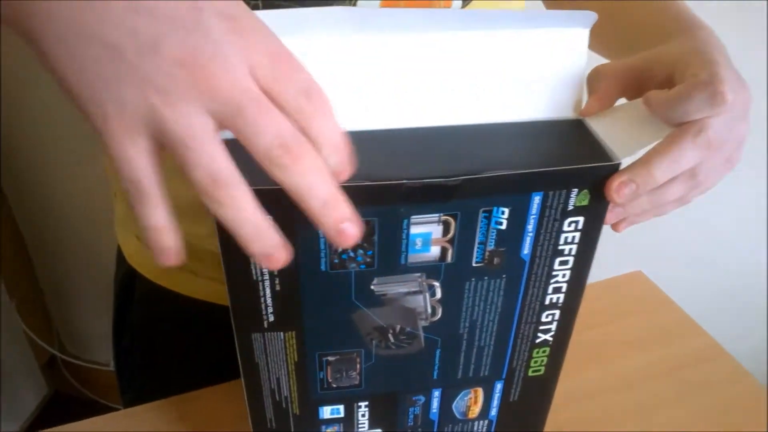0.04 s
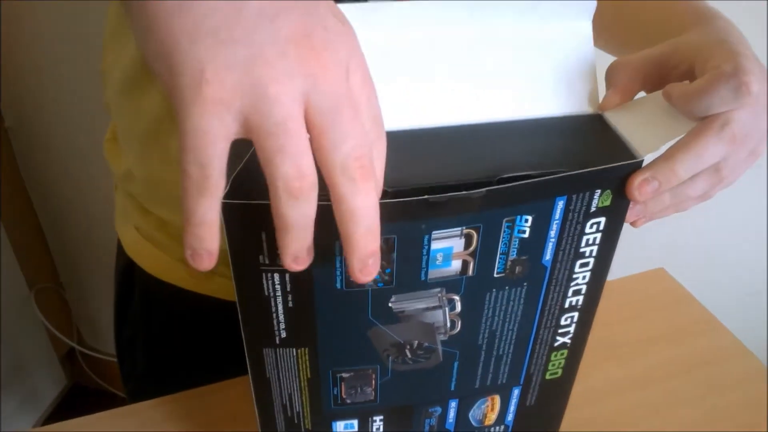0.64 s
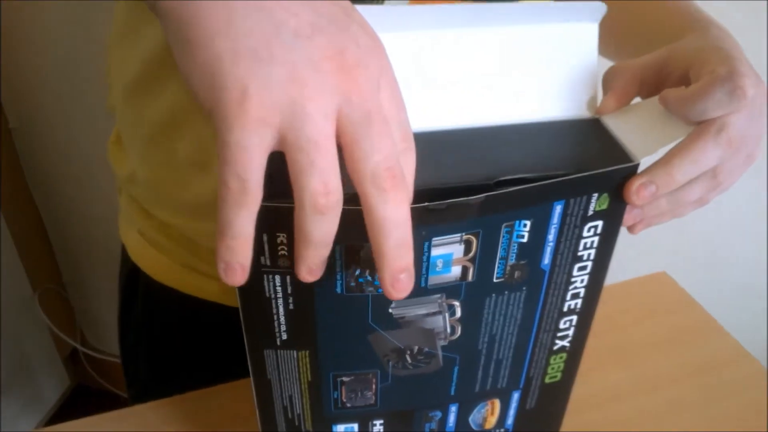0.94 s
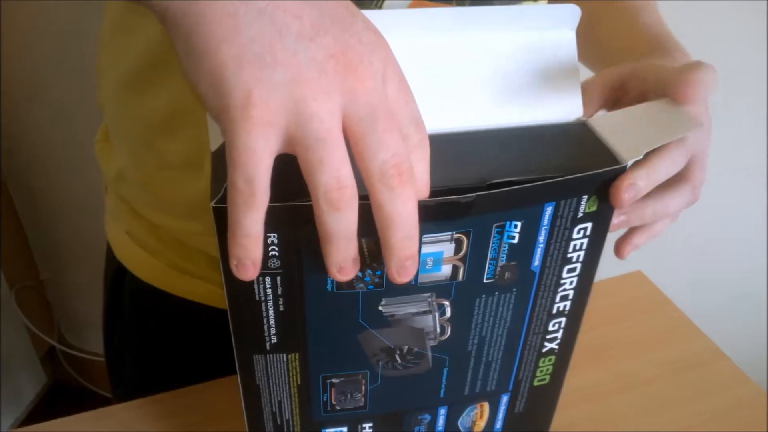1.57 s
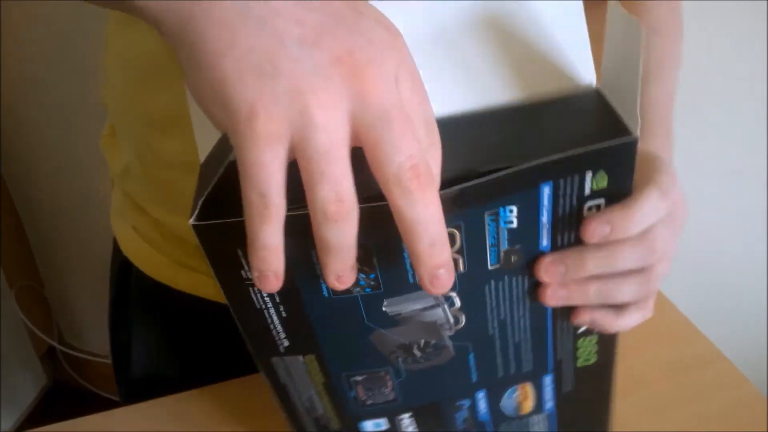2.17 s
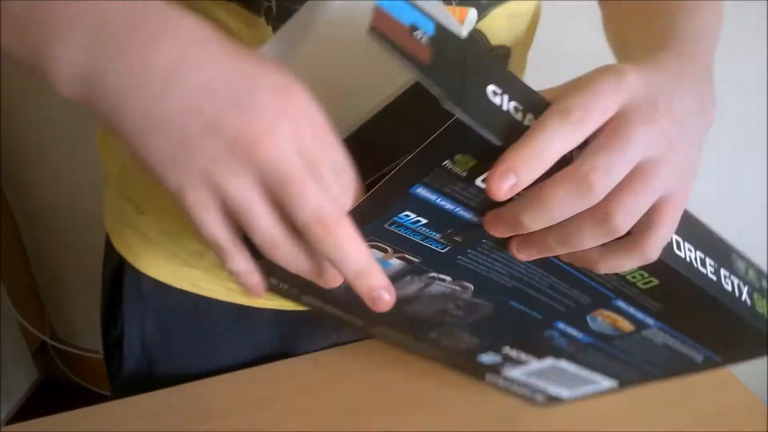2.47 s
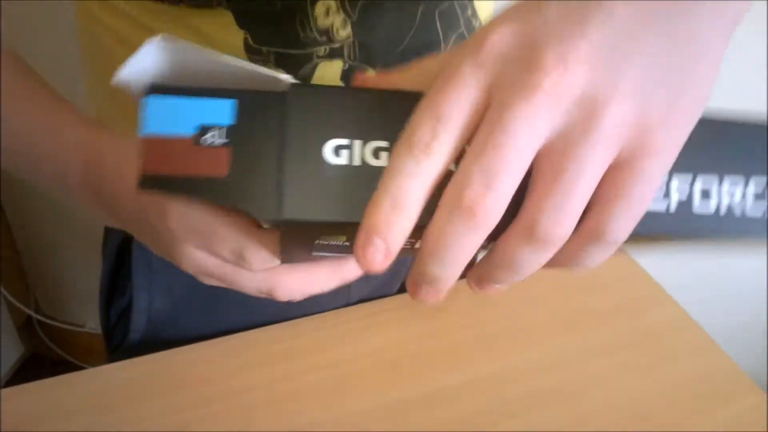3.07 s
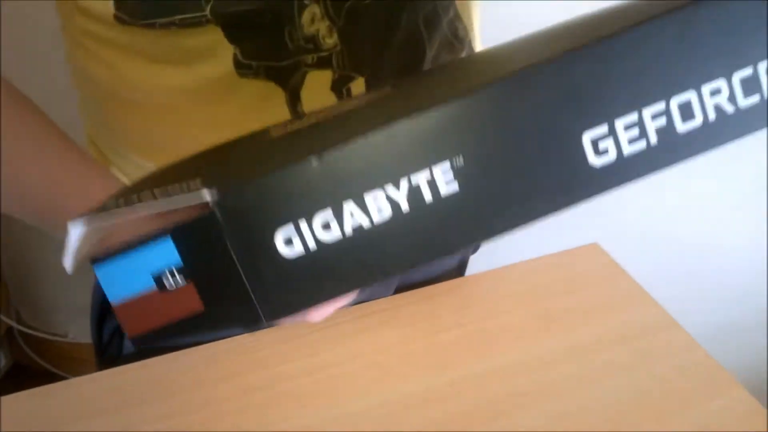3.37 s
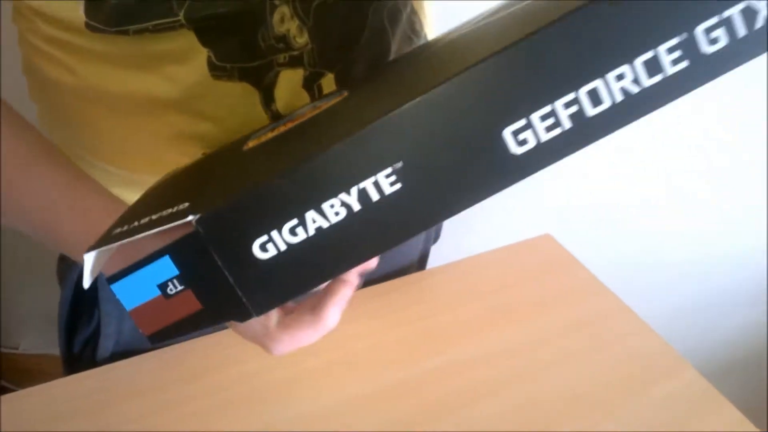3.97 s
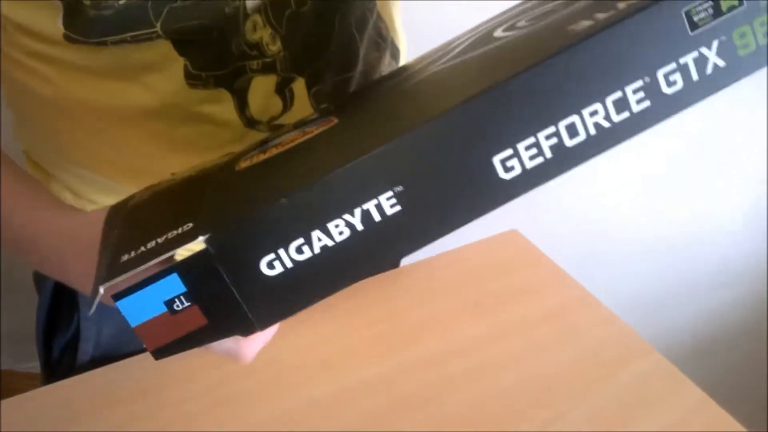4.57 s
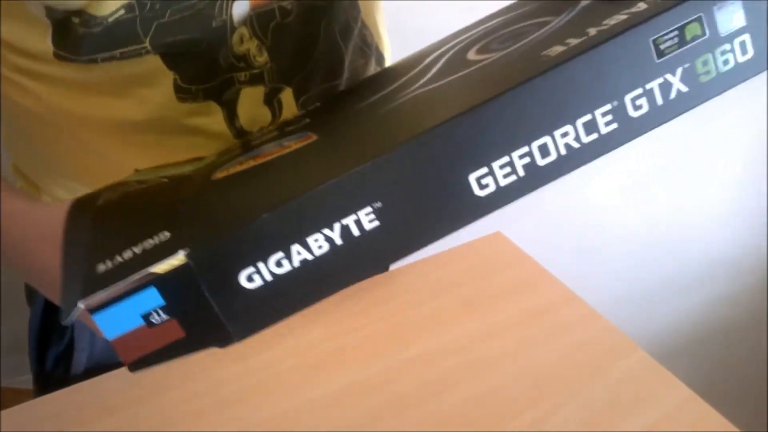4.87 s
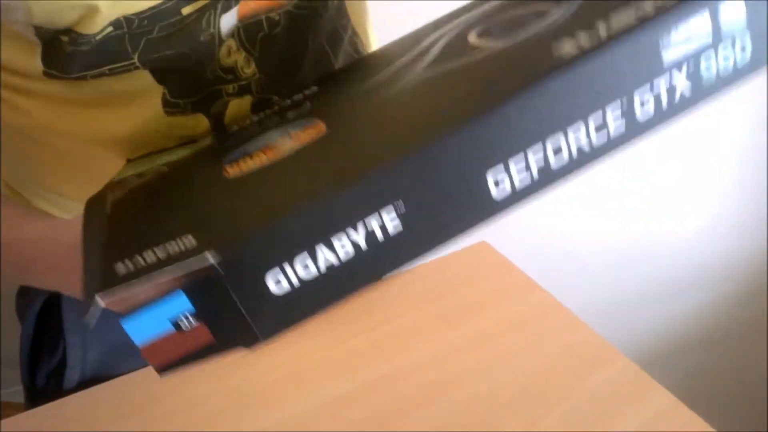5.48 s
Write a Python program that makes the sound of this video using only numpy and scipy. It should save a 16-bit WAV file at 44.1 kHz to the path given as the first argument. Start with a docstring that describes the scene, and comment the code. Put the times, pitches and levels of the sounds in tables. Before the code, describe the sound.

Fingertips drag and bump over a cardboard box, and the strained board gives scattered hollow ticks. A flap snaps free with a sharp crunch. The box is tipped with a short, squeaky scrape, then the inner box slides softly in its sleeve, with tiny cracks and one brief groan. The microphone is close, over a desk in a small, quiet room.

```python
"""Fingers brush and bump a cardboard box, close to a mono microphone over a desk in a small room.
The strained board lets go in single ticks that ring the hollow box, and a flap snaps free.
The box is tipped with a squeaky stick-slip scrape; then the inner box slides in its sleeve and
groans once. The desk and nearby walls add a short tail, with quiet room tone underneath."""
import sys
import numpy as np
from scipy import signal
from scipy.fft import rfft, irfft
from scipy.io import wavfile

SR = 44100
rng = np.random.default_rng(int(sys.argv[2]) if len(sys.argv) > 2 else 0)


def bounce(signal):
    """Save signal as a 16-bit WAV file at the path given by the first command-line argument."""
    frames = np.transpose(np.atleast_2d(signal))
    limited = np.clip(frames, -1, 1)
    pcm = np.round(limited * 32767).astype(np.int16)
    wavfile.write(sys.argv[1], SR, pcm)


N = 243431
TIME = np.arange(N) / SR
TAIL = TIME[:SR // 2]  # time axis of one short sound


def undb(db):
    """Decibels to gain."""
    return 10 ** (np.asarray(db) / 20)


def unit(x):
    """Scale to rms 1."""
    return x / np.sqrt(np.mean(x ** 2))


def unit_peak(x):
    """Scale to peak 1."""
    return x / np.abs(x).max()


def fade(t60_s):
    """Exponential decay from 1, down 60 dB after t60_s."""
    return np.exp(-np.log(1000) * TAIL / t60_s)


def burst(t60_s):
    """White noise that dies away."""
    return rng.standard_normal(len(TAIL)) * fade(t60_s)


def wander(rate_hz):
    """Random motion with a spread near 1."""
    return np.interp(TIME * rate_hz, np.arange(N), rng.standard_normal(N))


def add(track, start_s, sound):
    """Mix a sound in at a time."""
    i = int(start_s * SR)
    track[i:i + len(sound)] += sound[:N - i]


def through(x, response):
    """Pass a sound through an impulse response."""
    return signal.fftconvolve(x, response)[:len(x)]


def colour(x, points, size=4096):
    """Minimum-phase filter through (freq_hz, gain_db) points."""
    hz, db = np.transpose(points)
    bins_hz = np.arange(size // 2 + 1) * SR / size
    gain = undb(np.interp(np.log(bins_hz + 1), np.log(hz), db))
    cepstrum = irfft(np.log(gain))[:size // 2]
    cepstrum[0] /= 2
    return through(x, irfft(np.exp(rfft(2 * cepstrum, size))))


def ring(modes, detune=0):
    """Decaying modes with unit energy; detune is the grip shifting each a little."""
    out = np.zeros(len(TAIL))
    for hz, db, t60_s in modes:
        pitch_hz = hz * (1 + detune * rng.standard_normal())
        out += undb(db) * fade(t60_s) * np.sin(2 * np.pi * (pitch_hz * TAIL + rng.random()))
    return out / np.linalg.norm(out)


def grains(per_s, spread_db):
    """Fibres catching at random moments with varying force."""
    force = undb(spread_db * np.minimum(rng.standard_exponential(N), 2 * np.pi))
    return unit(rng.standard_normal(N) * force * (rng.random(N) < per_s / SR))


def stroke(start_s, length_s, attack_s, release_s):
    """Gain of one movement: it gathers speed, more slowly if it is long, holds, then dies away."""
    rise_s = attack_s + 0.14 * length_s
    rise = np.sin(np.pi / 2 * np.clip((TIME - start_s) / rise_s, 0, 1)) ** 2
    return rise * np.exp(-np.clip((TIME - start_s - length_s) / release_s, 0, 20))


# Room tone at the microphone: freq_hz, gain_db
ROOM_TONE_COLOUR = [(15, -14), (25, -12), (53, 0.5), (101, -5.5), (221, 0), (340, -7.5), (482, -10.5),
                    (1140, -15.5), (1750, -16.5), (2490, -17.5), (3630, -25), (5580, -24.5), (15500, -28)]
def room_tone(level_db=-58.5):
    """The small room's steady, low background noise."""
    return undb(level_db) * unit(colour(rng.standard_normal(N), ROOM_TONE_COLOUR))


def room(x, t60_s=0.25, wet_db=-11):
    """The close sound, then 5 ms later a short tail from the desk and nearby walls."""
    reflections = burst(t60_s) * (TAIL > 0.005)
    tail = colour(reflections, [(60, 0), (250, 3), (2000, -0.5), (6000, 2), (16000, -1.5)])
    return x + undb(wet_db) * through(x, tail / np.linalg.norm(tail))


# Modes of the hollow box: pitch_hz, level_db, t60_s
BOX_MODES = [(140, -4.5, 0.27), (225.7, -0.5, 0.22), (288, 1.5, 0.2), (345.1, 2, 0.29), (457, 2.5, 0.17),
             (547.7, -4, 0.25), (620, -8, 0.14), (828, -0.5, 0.16), (953, -5, 0.13), (1050, -12, 0.04),
             (1090, -17, 0.078), (1274, 1, 0.037), (1317, -1, 0.14), (1490, -15, 0.076), (1625, -12, 0.14),
             (1790, -7, 0.061), (1837, -24.5, 0.98), (1880, -9, 0.16), (2346, -3.5, 0.12), (2450, -9, 0.17),
             (2840, -11, 0.25), (3500, -21, 0.25)]
def with_box_ring(x, ring_db):
    """A contact sound plus the ringing it drives in the box, ring_db relative to it."""
    return x + undb(ring_db) * np.std(x) * unit(through(x, ring(BOX_MODES)))


# Shaken panels and brushing paper fibres: freq_hz, gain_db
RUMBLE_COLOUR = [(25, -28.5), (50, 2.5), (90, -8.5), (180, -1), (320, 4.5), (450, -7.5), (800, -8.5),
                 (1500, -41)]
HISS_COLOUR = [(1500, -36), (3000, -4), (3900, -1.5), (5200, 4), (6800, 1), (8200, -2.5), (10500, -1.5),
               (13000, -6), (16000, -10)]
def friction(strokes, rasp_colour, attack_s, release_s, grains_per_s, spread_db, ring_db):
    """Each stroke rasps on the board's grain, hisses over fine fibres and shakes the panels."""
    rumble = unit(colour(grains(per_s=900, spread_db=0.5), RUMBLE_COLOUR))
    rasp = colour(grains(grains_per_s, spread_db), rasp_colour)
    rasp = unit(with_box_ring(rasp, ring_db))
    hiss = colour(grains(per_s=14000, spread_db=0), HISS_COLOUR)
    hiss = unit(hiss * undb(0.5 * wander(120)))  # the fibres catch unevenly
    out = np.zeros(N)
    for start_s, length_s, rasp_db, hiss_db, rumble_db in strokes:
        blend = undb(rasp_db) * rasp + undb(hiss_db) * hiss + undb(rumble_db) * rumble
        out += stroke(start_s, length_s, attack_s, release_s) * blend
    return out


# Pushes of the inner box: start_s, length_s, rasp_db, hiss_db, rumble_db
SLIDES = [(3.32, 0.056, -54, -76, -49), (3.36, 0.4, -59, -66, -63.5), (3.478, 0.053, -60.5, -65.5, -51),
          (3.708, 0.027, -85, -61, -65), (3.78, 0.067, -69, -84, -81), (4, 0.079, -64.5, -75, -73),
          (4.2, 0.13, -64, -65.5, -65), (4.4, .04, -64.5, -71, -62), (4.438, 0.068, -52, -56.5, -48.5),
          (4.612, 0.026, -48.5, -57.5, -46.5), (4.655, 0.046, -52.5, -55.5, -45.5),
          (4.715, 0.063, -54.5, -69, -44.5), (4.835, 0.015, -54.5, -51.5, -53),
          (4.87, 0.055, -75, -66, -66), (4.918, .125, -53, -52.5, -68), (4.948, 0.072, -58.5, -52.5, -66),
          (5.03, 0.24, -56.5, -60, -61.5), (5.095, 0.094, -65.5, -57, -69), (5.28, 0.18, -66, -64.5, -63)]
# Board on board: freq_hz, gain_db
SLIDE_COLOUR = [(300, -26), (750, -9), (1200, -3), (1550, 1), (2050, 4), (2450, -1.5), (3000, -6.5),
                (3800, -12), (8000, -28)]
def sleeve_slides():
    """The inner box slides in its sleeve with a fine, dense rasp."""
    return friction(SLIDES, SLIDE_COLOUR, attack_s=0.014, release_s=0.016,
                    grains_per_s=9900, spread_db=1.6, ring_db=-13.5)


# Rubbing fingers and the tipping box, close up: start_s, length_s, rasp_db, hiss_db, rumble_db
RASPS = [(-.02, 0.083, -64, -62.5, -67), (.06, 0.058, -53, -55.5, -51), (.12, 0.11, -61, -60.5, -46),
         (.22, 0.048, -48, -52.5, -58), (.272, 0.083, -50, -56.5, -53), (.358, 0.054, -46.5, -53, -52.5),
         (.41, 0.032, -51.5, -58, -51.5), (.518, 0.14, -65, -70.5, -56), (.715, 0.054, -51, -53.5, -58),
         (.79, 0.12, -82, -87, -60.5), (.91, 0.053, -55.5, -58, -60), (.975, 0.072, -65, -66.5, -61),
         (1.1, 0.073, -68, -62.5, -61), (1.23, 0.21, -74, -63, -61), (1.503, .03, -37.5, -46.5, -46),
         (1.575, 0.057, -52.5, -63, -49), (1.83, 0.068, -60, -64, -52.5), (1.955, .08, -57.5, -63.5, -58),
         (2.05, 0.092, -59, -64, -58), (2.1, .095, -49, -50.5, -49), (2.2, 0.094, -48, -60, -48.5),
         (2.31, 0.071, -35, -50.5, -43), (2.38, 0.062, -45.5, -51, -60), (2.45, 0.08, -55.5, -64.5, -50),
         (2.515, 0.062, -54.5, -58.5, -62), (2.6, 0.084, -50.5, -55.5, -67),
         (2.642, .058, -40.5, -48, -40.5), (2.74, .1, -69, -74, -66), (2.875, 0.055, -53.5, -55, -51),
         (3.112, 0.038, -55, -55.5, -57)]
# Rasp of the outer board: freq_hz, gain_db
RASP_COLOUR = [(200, -17), (500, -1), (900, 1.5), (1300, 8), (1900, 1.5), (2700, -1), (3800, -11),
               (8000, -54.5)]
def surface_rasps():
    """Rasp and hiss of rubbing fingers and of the box scraping as it tips."""
    return friction(RASPS, RASP_COLOUR, attack_s=0.016, release_s=0.014,
                    grains_per_s=3000, spread_db=-0.8, ring_db=-10.5)


def scrape(curve, board_colour, slip_hz, speed_up, jitter, grit, force_spread_db, ring_db, trim_db):
    """Uneven stick-slip pulses shake the board and box; their rate grows by the factor speed_up."""
    times_s, levels_db = np.transpose(curve)
    rate_hz = slip_hz * speed_up ** np.interp(TIME, (times_s[0], times_s[-1]), (0, 1))
    cycles = np.cumsum(rate_hz * np.exp(jitter * wander(300))) / SR
    pulses = np.diff(np.floor(cycles), prepend=0)  # one slip per cycle
    slips = pulses * undb(force_spread_db * wander(400)) / np.sqrt(rate_hz)
    drive = unit(slips - slips.mean()) + grit * rng.standard_normal(N)
    moving = (TIME >= times_s[0]) & (TIME <= times_s[-1])
    swell = undb(np.interp(TIME, times_s, levels_db + trim_db)) * moving
    return with_box_ring(unit(colour(drive, board_colour)) * swell, ring_db)


# Swell of the drag across the lid: time_s, level_db
DRAG_SWELL = [(.155, -40.5), (.19, -33.5), (.275, -42.5), (.292, -52)]
# The lid under the fingertips: freq_hz, gain_db
DRAG_COLOUR = [(40, -12), (90, -6), (140, 3.5), (300, -1.5), (420, -10), (650, 0), (1000, -6.5),
               (1400, -18), (1800, -7.5), (2500, -25), (4000, -47), (15000, -43)]
def lid_drag():
    """Fingertips stutter over the lid, sticking and slipping almost regularly."""
    return scrape(DRAG_SWELL, DRAG_COLOUR, slip_hz=137.2, speed_up=1.1, jitter=0.101, grit=0.66,
                  force_spread_db=2.5, ring_db=-15, trim_db=-1.5)


# Swell of the scrape as the box tips: time_s, level_db
TIPPING_SWELL = [(2.107, -55), (2.145, -41), (2.22, -35), (2.32, -27.5), (2.362, -38), (2.395, -57),
                 (2.46, -51)]
# The scraping board: freq_hz, gain_db
TIPPING_COLOUR = [(25, -28), (60, -2), (130, -10), (260, -0.5), (340, -8), (470, 2.5), (690, -6),
                  (900, -3.5), (1150, -2.5), (1500, -2.5), (2200, -10), (2900, -17.5), (4000, -23),
                  (15000, -47)]
def tipping_scrape():
    """The box tips with ragged slips that come faster and faster."""
    return scrape(TIPPING_SWELL, TIPPING_COLOUR, slip_hz=150.2, speed_up=3.5, jitter=0.6, grit=1,
                  force_spread_db=1, ring_db=-0.5, trim_db=-3.5)


def judder(events, sag_hz_per_s, attack_s, release_s, waver, waver_hz, rough_db, overtone_db):
    """Stick-slip locked to one resonance: a rough tone with weak overtones that sags while it lasts."""
    out = np.zeros(N)
    for start_s, length_s, hz, db in events:
        pitch_hz = hz - sag_hz_per_s * np.clip(TIME - start_s, 0, length_s)
        phase = 2 * np.pi * np.cumsum(pitch_hz * (1 + waver * wander(waver_hz))) / SR
        tone = np.sin(phase) + undb(overtone_db) * (np.sin(2 * phase) + 0.5 * np.sin(3 * phase))
        rough_tone = unit(tone * undb(rough_db * wander(waver_hz)))
        out += undb(db) * rough_tone * stroke(start_s, length_s, attack_s, release_s)
    return out


# One groan and its faint trailing end: start_s, length_s, pitch_hz, level_db
GROAN = [(4.707, 0.015, 321, -25.5), (4.74, 0.028, 296, -47)]
def panel_groan():
    """A panel judders as the sleeve lets go."""
    return judder(GROAN, sag_hz_per_s=1130, attack_s=0.0041, release_s=0.0054,
                  waver=0.0199, waver_hz=230, rough_db=1.5, overtone_db=-12.5)


# Squeaks, most of them as the box tips: start_s, length_s, pitch_hz, level_db
SQUEAKS = [(.378, 0.0076, 1327, -48), (2.252, .05, 1810, -32.5), (2.27, 0.081, 848, -41),
           (2.312, 0.042, 1783, -25), (2.32, 0.026, 982, -38), (2.312, 0.026, 1990, -29.5),
           (2.338, 0.026, 2216, -28), (2.345, 0.035, 1086, -34.5), (2.355, 0.012, 1618, -29.5),
           (2.365, 0.033, 842, -44), (2.652, 0.037, 1233, -39)]
def squeaks():
    """Edges and fingertips stick and slip in rough squeals that set the box ringing."""
    squeals = judder(SQUEAKS, sag_hz_per_s=185, attack_s=0.0075, release_s=0.0096,
                     waver=0.0298, waver_hz=900, rough_db=4.5, overtone_db=-24.5)
    return with_box_ring(squeals, ring_db=-8)


# Soft bumps, and the ring of a sharper knock: start_s, peak_db, pitch_hz
PANEL_TONES = [(0.101, -30.5, 247), (0.1351, -25.5, 248), (.161, -22.5, 230), (0.1921, -24.5, 172),
               (.262, -32.5, 143), (.7135, -21, 293), (.722, -30.5, 455), (.738, -27, 170), (.748, -36, 55),
               (.759, -29, 162), (.788, -29.5, 140), (1.091, -31.5, 241), (1.511, -28.5, 318),
               (1.869, -34, 203), (1.9209, -25.5, 202), (1.942, -33.5, 139), (2.138, -37, 130),
               (2.666, -33, 185), (2.91, -51, 210), (3.148, -46, 90), (3.302, -40, 137),
               (3.308, -37.5, 140), (3.505, -36.5, 75), (3.521, -32.5, 243), (4.332, -47, 224),
               (4.708, -23, 767), (4.728, -40, 75), (5.216, -41, 162), (5.456, -40, 84.5),
               (5.467, -35, 200)]
def panel_tones(contact_s=0.00069, swings=4.56):
    """Short damped tones: a bumped or knocked panel swings a few times and dies away."""
    out = np.zeros(N)
    onset = 1 - np.exp(-TAIL / contact_s)
    for start_s, db, hz in PANEL_TONES:
        swing = np.sin(2 * np.pi * hz * TAIL) * fade(swings / hz) * onset
        add(out, start_s, undb(db) * unit_peak(swing))
    return out


# The flap slips twice, then snaps free: start_s, crunch_peak_db, crunch_t60_s
SNAPS = [(1.606, -37, 0.055), (1.6788, -27.5, 0.067), (1.6876, -12.5, 0.03)]
# Crunch of its edge: freq_hz, gain_db
SNAP_COLOUR = [(120, -37), (300, -12), (520, -1), (850, -22), (1300, -4.5), (1900, -1), (2250, -9.5),
               (3100, 5), (3800, -15), (4500, -12), (5100, -5), (8000, -13.5), (8800, -17), (10800, -10.5),
               (15500, -28)]
# Modes of the flap: pitch_hz, level_db, t60_s
FLAP_MODES = [(505, -31, .25), (1545, 11, 0.1), (1925, 9, 0.06), (2260, 0, 0.24), (2980, -0.5, 0.31),
              (3270, 7, 0.078), (4600, -9.5, 0.18), (5240, -3, 0.17), (5561, -11, 0.1), (6800, -13, 0.12),
              (7950, 6, 0.08)]
def flap_snaps(attack_s=0.0022, ring_db=-9):
    """The flap's edge crunches past the box wall and leaves the flap ringing."""
    out = np.zeros(N)
    onset = 1 - np.exp(-TAIL / attack_s)
    for start_s, db, t60_s in SNAPS:
        crunch = unit_peak(colour(burst(t60_s) * onset, SNAP_COLOUR))
        ringing = undb(ring_db) * np.linalg.norm(crunch) * ring(FLAP_MODES)
        add(out, start_s, undb(db) * (crunch + ringing))
    return out


# Cracking board heard close up: freq_hz, gain_db
CRACK_COLOUR = [(500, -51), (1900, 8.5), (2800, 2.5), (3500, -6.5), (4400, -5), (5400, -1.5), (8000, -13.5),
                (12000, -13.5), (16000, -28)]
def crack(t60_s):
    """Strained board gives way in a short, bright burst."""
    return unit_peak(colour(burst(t60_s), CRACK_COLOUR))


def sleeve_creaks(from_s=4.01, to_s=4.31, max_peak_db=-52, range_db=2, count=6):
    """The strained sleeve gives tiny cracks at random moments while the box is held up."""
    out = np.zeros(N)
    for moment, force in rng.random((count, 2)):
        peak_db = max_peak_db - range_db * (1 - force)
        add(out, from_s + moment * (to_s - from_s), undb(peak_db) * crack(t60_s=0.013))
    return out


# Ticks close to the microphone: start_s, knock_peak_db, relative_crack_db, extra_ring_db
TICKS = [(.1385, -29.5, -16, 6), (.165, -25.5, -21, 3.5), (0.183, -28.5, -20, 7), (.197, -31, -22, 4),
         (0.2327, -26.5, -29, -4), (.713, -21.5, -16, 1.5), (0.737, -38.5, 3.5, -8), (.759, -29, -8.5, -2),
         (0.788, -31, -5, -10), (1.0896, -18.5, -20.5, -3), (1.209, -22, -27, -1), (1.3, -23.5, -19, -2),
         (1.3355, -25, -20, -3), (1.358, -22, -18, 2.5), (1.381, -17.5, -18.5, -5), (1.511, -19.5, -13, -7),
         (1.526, -23, -23, 6), (1.64, -35, -3.5, -12), (1.807, -36.5, -10, 5.5), (1.922, -17.5, -13, -0.5),
         (1.931, -22.5, -11.5, -1.5), (2.051, -21.5, -30, -5), (2.1079, -24.5, -7, 6.5),
         (2.47, -35, -14, -13), (2.528, -38, 3.5, -2), (2.662, -23.5, -23, 2), (3.098, -37, -18, -9),
         (3.1143, -41.5, 1, 0), (3.338, -38, -4, 5), (3.379, -44.5, -2, 7), (4.332, -43, -6, 7),
         (4.442, -37.5, -14, 6), (4.491, -32, 2.5, 0), (4.626, -39.5, 3.5, 12), (4.705, -27.5, -2, -17),
         (4.708, -28, -25, 5), (4.849, -45.5, -3, 10), (5.111, -44.5, 6.5, 4), (5.447, -48.5, 1, -7)]
# The knock in each tick: freq_hz, gain_db
KNOCK_COLOUR = [(40, -9), (130, -12), (300, 4), (700, -6.5), (1350, 1), (2000, -7.5), (2400, -21.5),
                (2850, -10.5), (3600, -31.5), (5000, -39.5), (16000, -51)]
def board_ticks(flutter=0.074, ring_db=-4):
    """Each release is a sharp push, a brief flutter across the board, a crack and the box's ring."""
    out = np.zeros(N)
    for start_s, db, crack_db, extra_ring_db in TICKS:
        drive = flutter * burst(t60_s=0.025)
        drive[0] -= 1  # the sharp push
        knock = unit_peak(colour(drive, KNOCK_COLOUR))
        treble = undb(crack_db) * crack(t60_s=0.023)
        body = undb(ring_db + extra_ring_db) * np.linalg.norm(knock) * ring(BOX_MODES, detune=0.0254)
        add(out, start_s, undb(db) * (knock + body + treble))
    return out


def scene():
    """All the handling at one close microphone over the desk, with the room's tail and steady tone."""
    rubbing = lid_drag() + tipping_scrape() + surface_rasps() + sleeve_slides() + panel_groan()
    impacts = board_ticks() + sleeve_creaks() + panel_tones() + flap_snaps()
    handling = rubbing + impacts + squeaks()
    background = room_tone()
    return (room(handling) + background)[None]


def record(dry):
    """The recorder cuts the top steeply above 15.85 kHz."""
    lowpass = signal.ellip(10, 0.2, 70, 15850, fs=SR, output="sos")
    return signal.sosfilt(lowpass, dry)


dry = scene()
out = record(dry)
bounce(out)
```